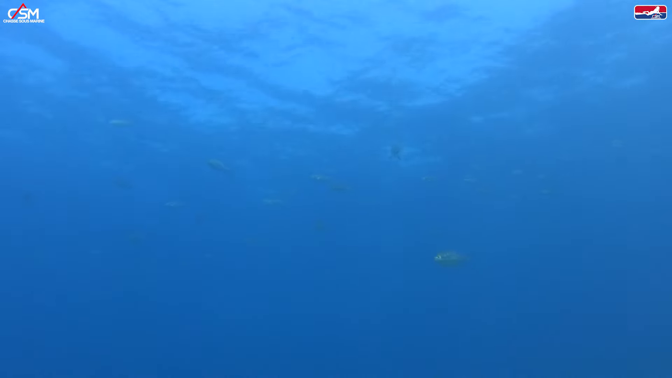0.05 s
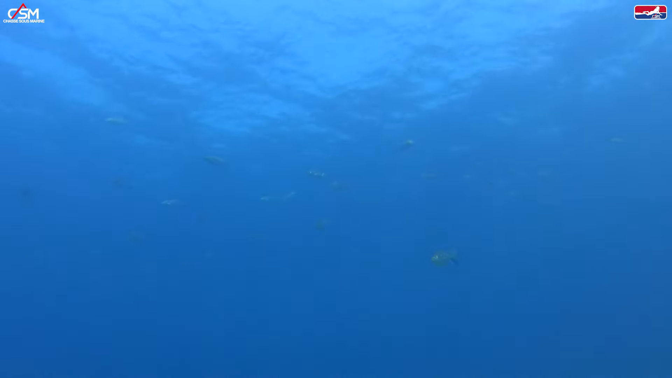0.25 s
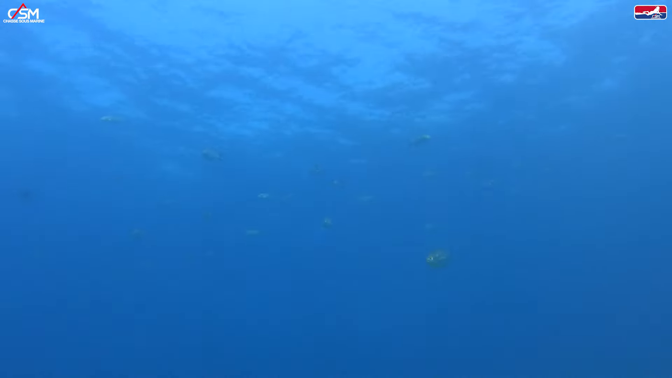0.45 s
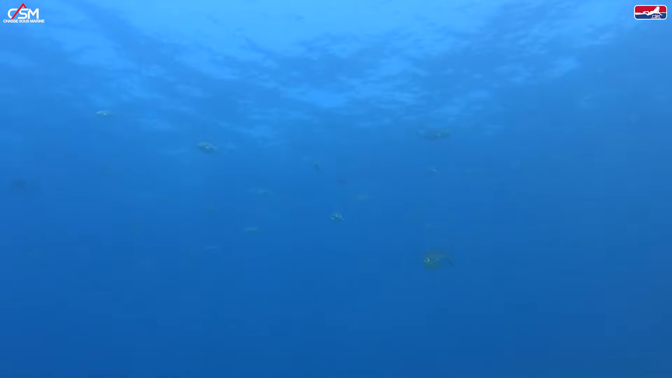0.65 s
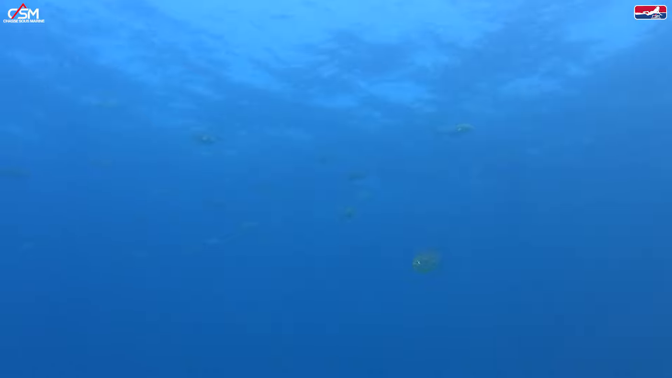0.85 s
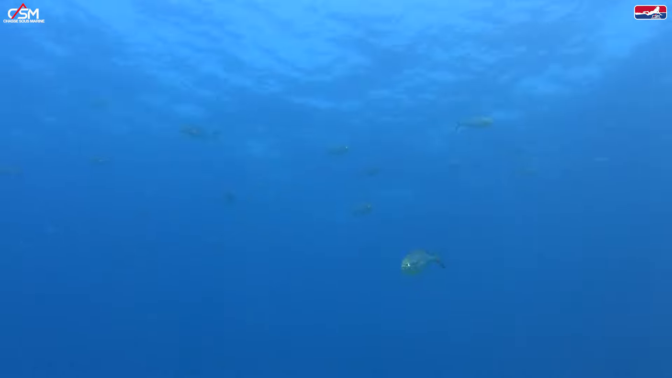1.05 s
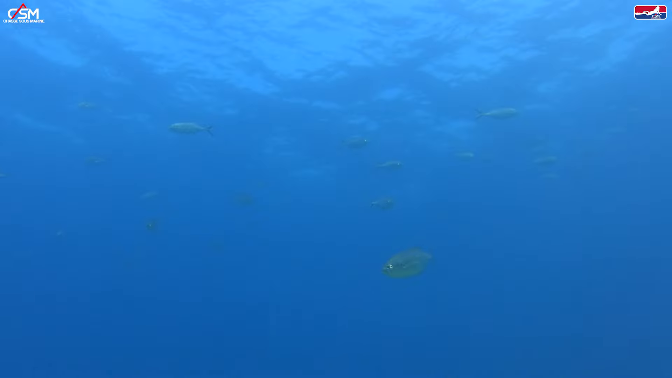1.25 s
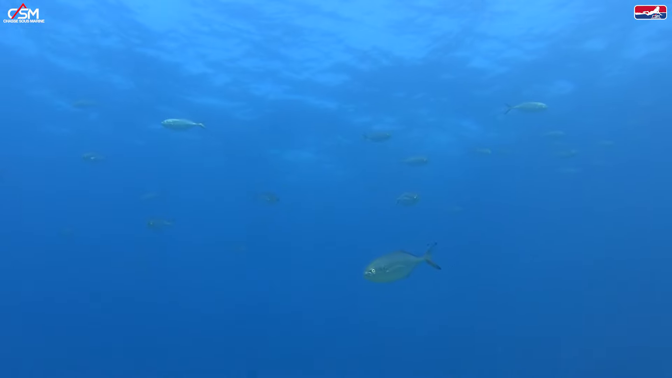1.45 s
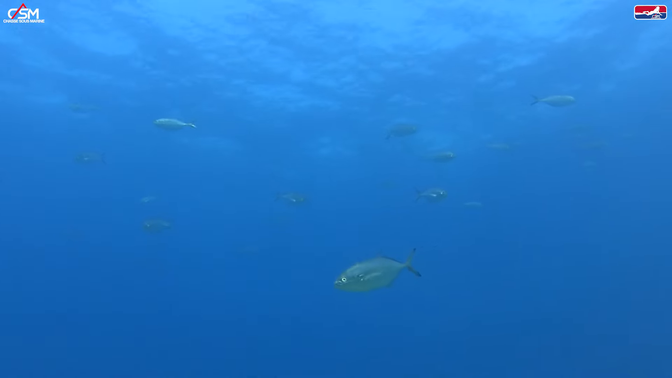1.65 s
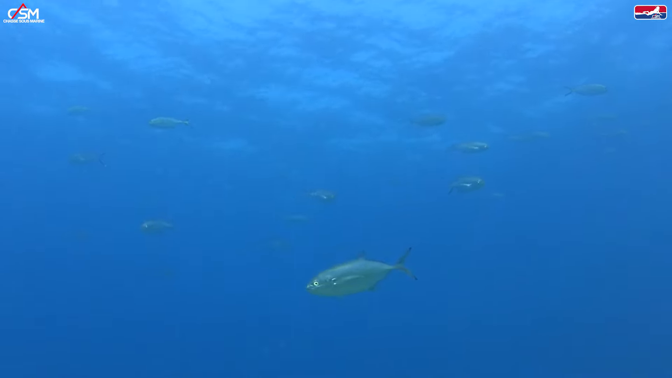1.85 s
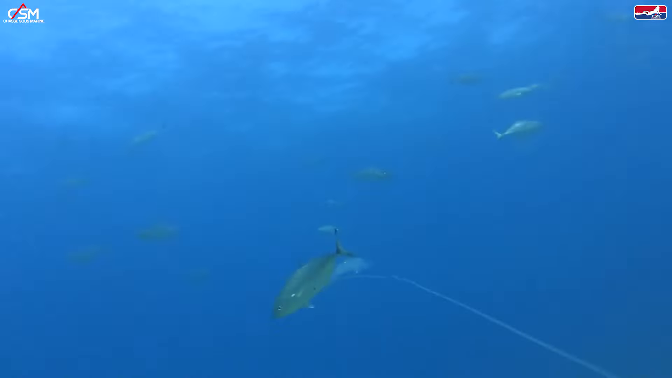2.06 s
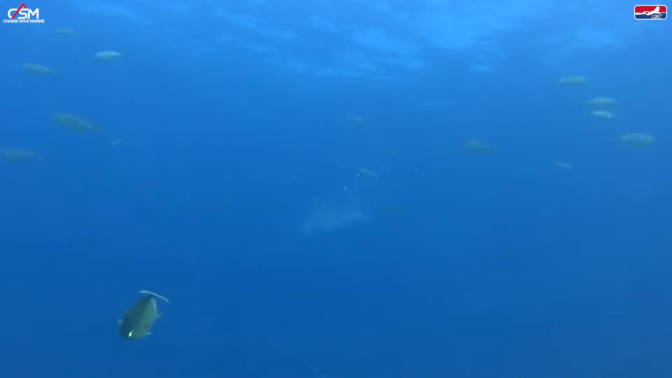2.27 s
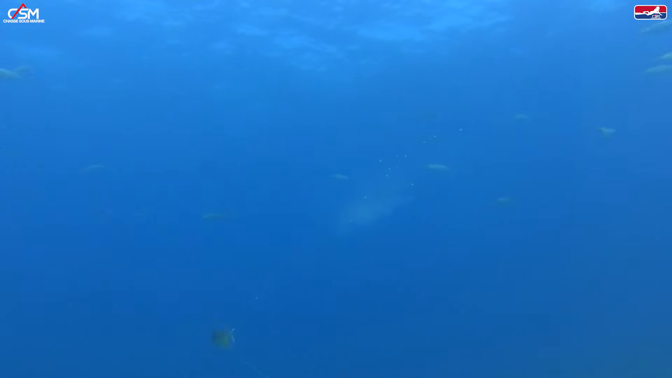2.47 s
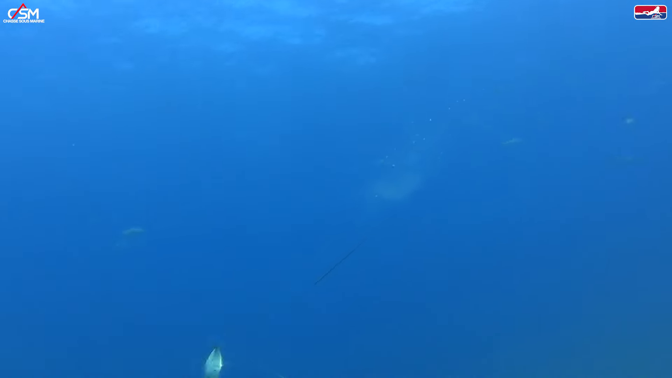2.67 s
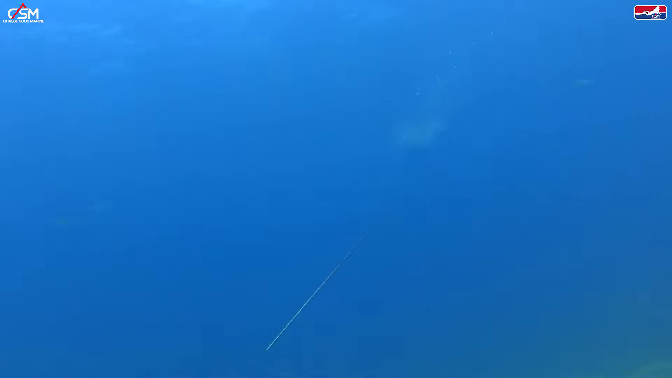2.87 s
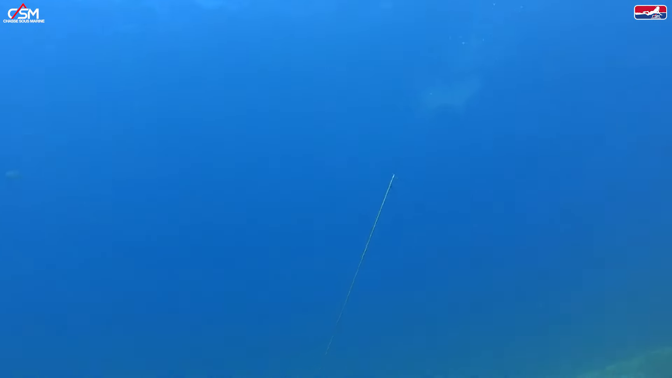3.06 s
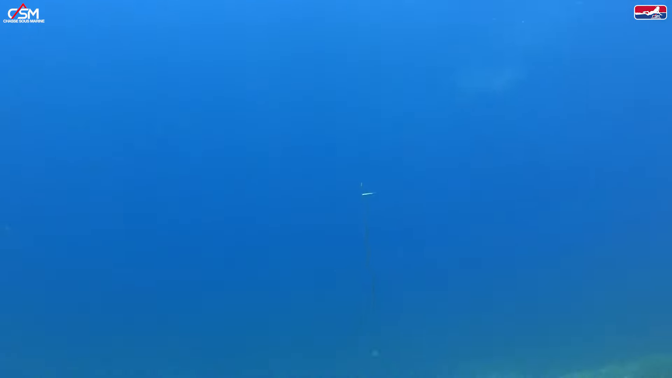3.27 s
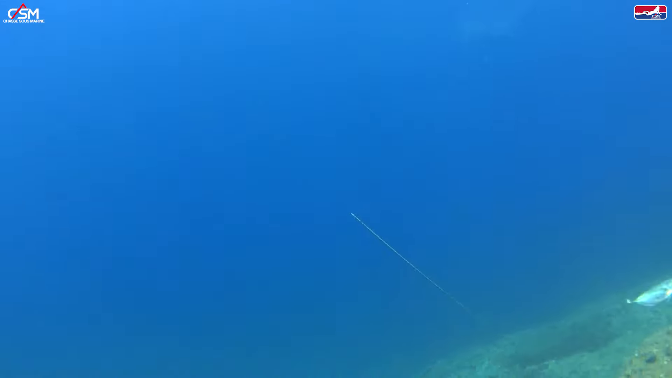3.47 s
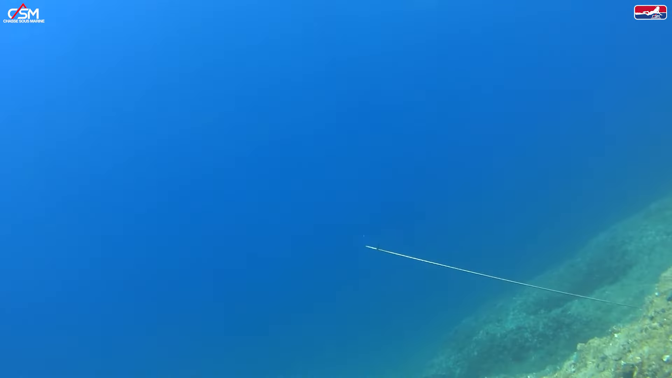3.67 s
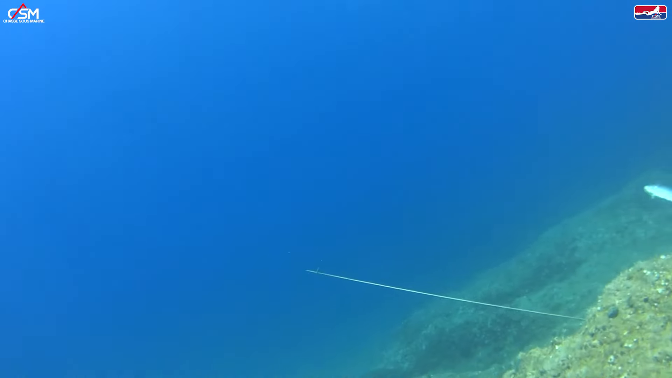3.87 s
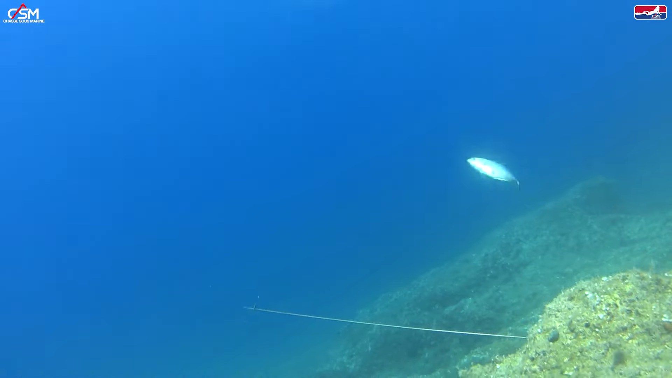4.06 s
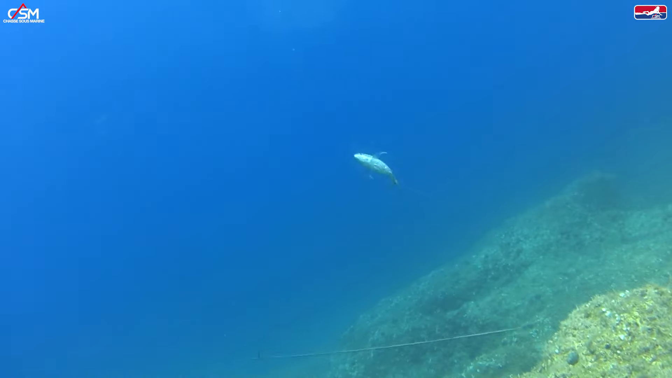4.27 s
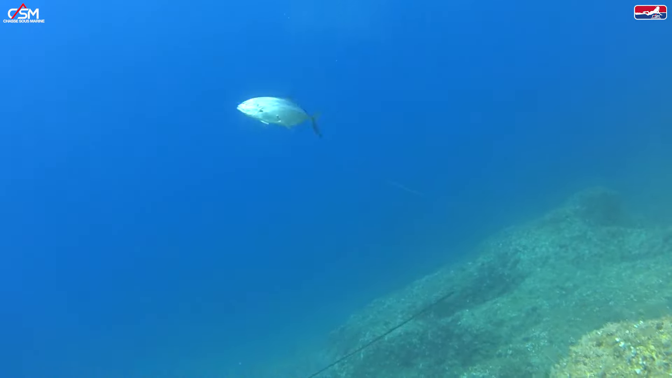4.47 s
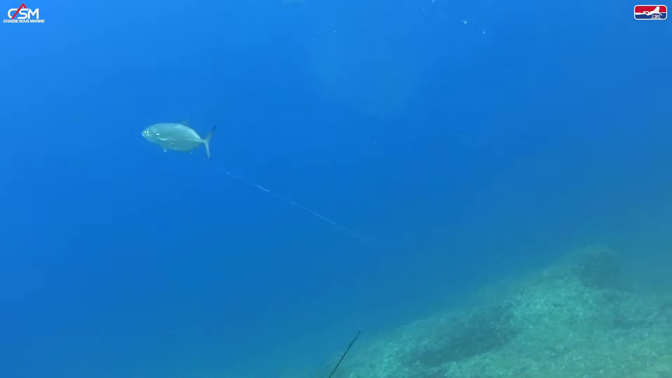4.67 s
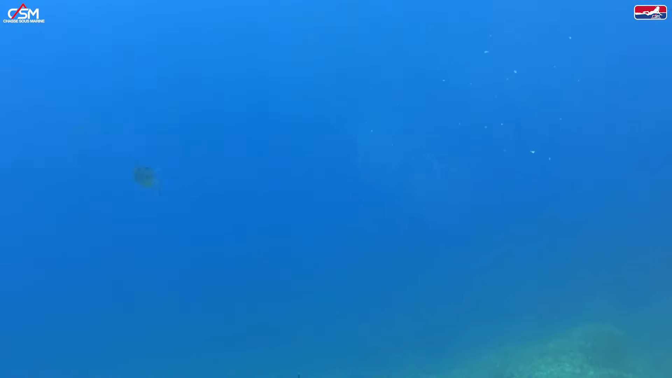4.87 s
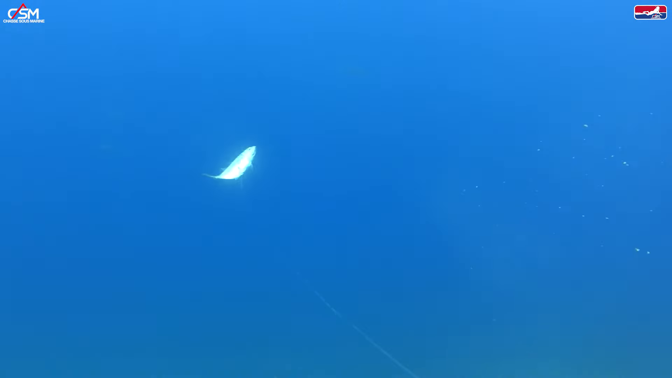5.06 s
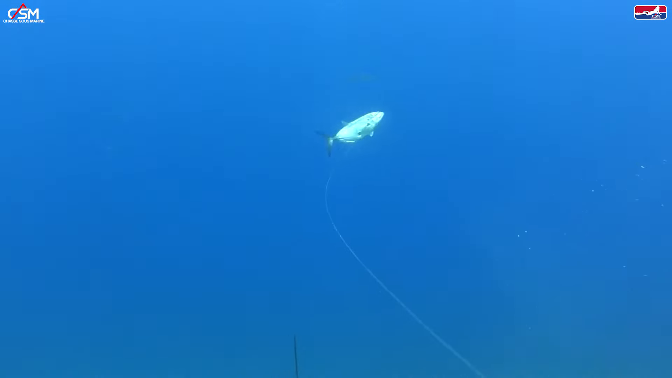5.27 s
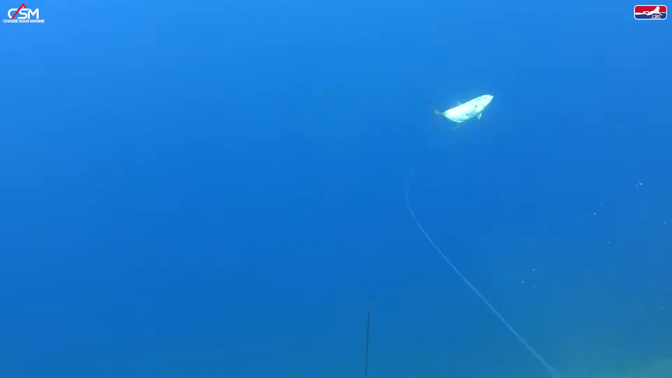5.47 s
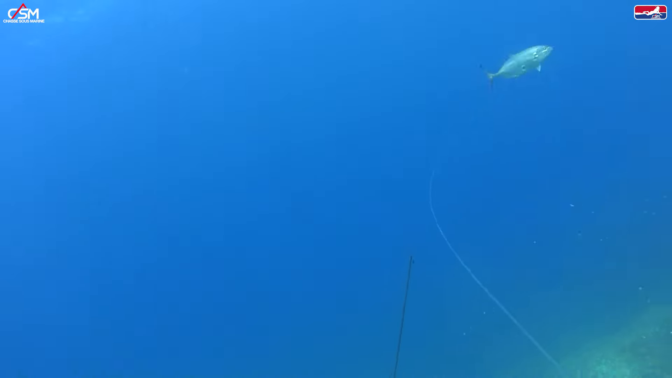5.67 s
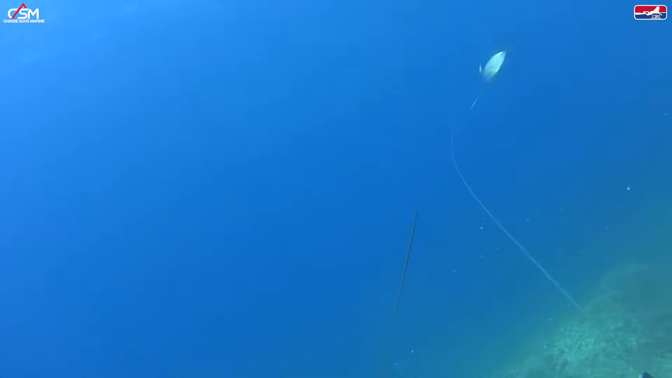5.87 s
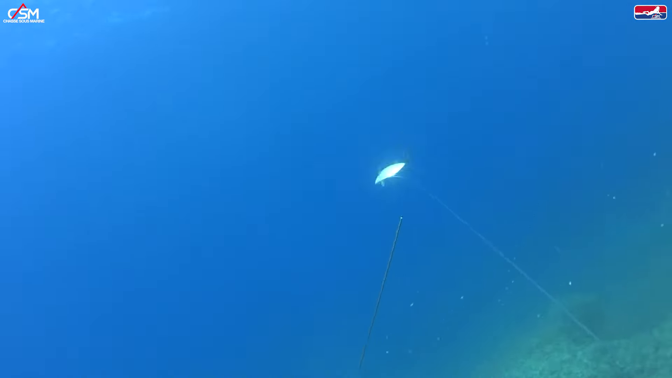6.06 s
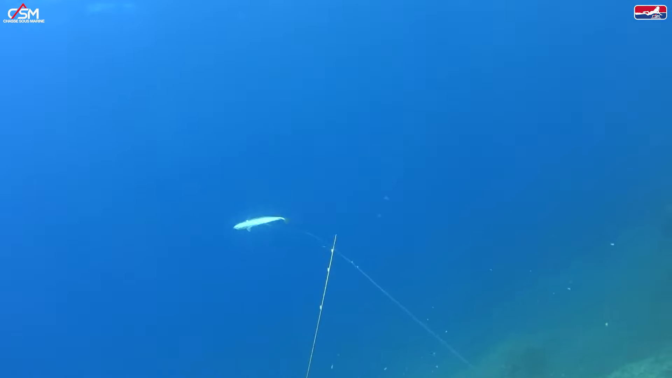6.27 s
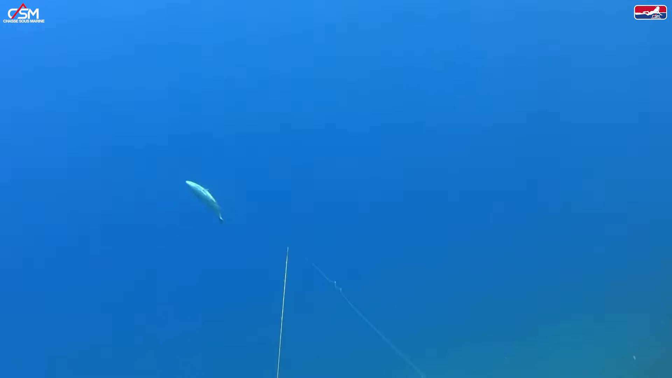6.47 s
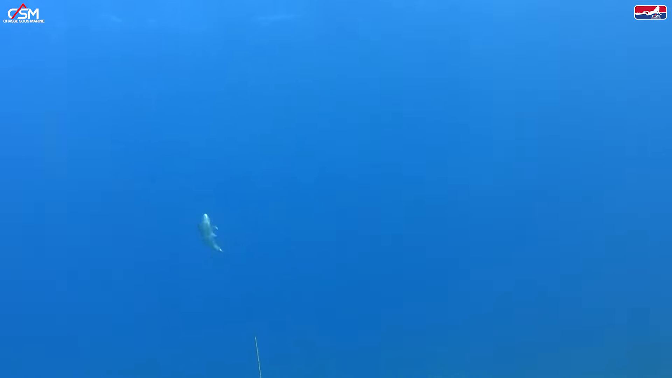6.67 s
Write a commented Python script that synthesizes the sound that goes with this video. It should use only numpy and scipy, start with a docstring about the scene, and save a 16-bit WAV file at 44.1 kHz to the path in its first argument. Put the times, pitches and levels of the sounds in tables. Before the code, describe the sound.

Underwater in open sea near a reef, heard through a sealed housing close to a speargun. Two seconds of quiet hiss, low rumble, soft hum, faint warble and sharp shrimp snaps. Then a loud, boomy shot with rapid knocks and clatter lasting about half a second. A reel follows, rumbling and rattling in quickening pulses as a speared fish pulls line, with faint low strums, until it fades.

```python
"""A hissing, rumbling sea is heard first, with a soft hum, a faint low warble, shrimp snapping on the reef and
now and then a dull knock on the housing. A speargun is then fired under water: shot, recoil and line clatter
shake a sealed camera housing fixed near it. A speared fish drags line off a reel that rumbles and throbs once a
turn, while the taut line strums. Blows, reel, snaps and knocks are pushes that ring the modes of the housing;
sea and tones are noise and narrow bands."""
import sys
import numpy as np
from scipy import signal
from scipy.fft import rfft, irfft, next_fast_len
from scipy.io import wavfile
from scipy.ndimage import uniform_filter1d

SR = 44100
rng = np.random.default_rng(int(sys.argv[2]) if len(sys.argv) > 2 else 0)


def magnitude_from_level(level_db):
    """Linear magnitude for a level in decibels (20 dB per decade)."""
    exponent = np.asarray(level_db, float) / 20
    return 10 ** exponent


def digitize_waveform(pressure):
    """Quantize a signal to 16-bit integers and store it at the path in sys.argv[1].

    Rows of a 2-D input are taken as channels; values are limited to [-1, 1].
    """
    field = np.atleast_2d(pressure).T
    bounded = np.clip(field, -1, 1)
    quanta = np.round(bounded * 32767).astype(np.int16)
    wavfile.write(sys.argv[1], SR, quanta)


N = 296504   # samples


def in_time(rows):
    """Linear interpolation: the columns of a curve at every sample."""
    table = np.transpose(rows)
    return [np.interp(np.arange(N) / SR, table[0], column) for column in table[1:]]


def between(hz, anchors_hz, levels_db):
    """Interpolation on a log-frequency axis between the level columns of the anchor pitches."""
    place = np.interp(np.log(hz), np.log(anchors_hz), np.arange(len(anchors_hz)))
    low = min(int(place), len(anchors_hz) - 2)
    return levels_db[low] + (place - low) * (levels_db[low + 1] - levels_db[low])


def drift(rate_hz):
    """Low-pass noise: white noise through two equal poles, scaled to a spread of 1."""
    step = 40   # samples between computed points
    r = np.exp(-2 * np.pi * step * rate_hz / SR)
    white = rng.standard_normal(N // step + 2002)
    slow = signal.lfilter([1], [1, -2 * r, r * r], white)[2000:]   # settled part
    return np.interp(np.arange(N) / step, np.arange(len(slow)), slow / slow.std())


def grains(per_s, spread_db):
    """Shot noise: random clicks of uneven size and either sign, rms 1."""
    sizes = magnitude_from_level(spread_db * np.minimum(rng.exponential(1, N), 4)) * rng.choice([-1, 1], N)
    scattered = sizes * (rng.random(N) < per_s / SR)
    return scattered / scattered.std()


def clicks(at_s, heights):
    """Impulse excitation: one-sample pushes at the given times."""
    marks = np.full(N, 1e-18)
    np.add.at(marks, (np.asarray(at_s) * SR).astype(int), heights)
    return marks


def wavering(rows, width_hz, left_db, right_db, lead):
    """Random modulation of a gliding carrier gives a narrow, unsteady band; the left leads by a phase angle."""
    hz, level_db = in_time(rows)
    envelope = drift(width_hz) + 1j * drift(width_hz)
    tone = envelope * np.exp(2j * np.pi * np.cumsum(hz) / SR)
    left = magnitude_from_level(left_db) * (tone * np.exp(1j * lead)).real
    right = magnitude_from_level(right_db) * tone.real
    return magnitude_from_level(level_db) * np.array([left, right])


# sea background spectrum: f/Hz, level/dB per Hz, left-right likeness (0-1), left lead/rad
SEA_SPECTRUM = [(22.1, -61, 1, -2.9), (45, -73.5, 0.7, 0.6), (90, -85, 0.73, -1), (200, -84.5, 0.2, 1),
                (415, -84.5, 0.78, -2.5), (860, -86, 0.97, -2), (1046, -86, 0.76, -1.07),
                (1400, -93, 0.76, -2), (2280, -97.5, 0.95, -2), (4500, -105, 0.17, -2.5),
                (6040, -102, 0.53, -4.5), (6600, -107, 0.2, -5.5), (9400, -109, 0.6, -5.5),
                (10400, -110, 1, -18.5)]


def sea():
    """Partial coherence: coloured noise partly shared by the two microphones, with a gentle swell."""
    size = next_fast_len(N)
    hz = np.maximum(np.fft.rfftfreq(size, 1 / SR), 1)
    table = np.transpose(SEA_SPECTRUM)
    level_db, alike, lead = [np.interp(np.log(hz), np.log(table[0]), column) for column in table[1:]]
    alike = np.clip(alike, 0, 1)
    shared, own = rfft(rng.standard_normal((2, size)))
    left = alike * np.exp(1j * lead) * shared + np.sqrt(1 - alike ** 2) * own
    colour = magnitude_from_level(level_db) * np.sqrt(SR / 2) * (hz > 14)
    noise = irfft(colour * np.array([left, shared]), size)[:, :N]
    return noise * magnitude_from_level(1.0 * drift(1.2))


# swelling and fading of the low hum: t/s, level/dB
HUM_LEVEL = [(0, -55.5), (.33, -55.5), (.42, -72), (.7, -66.5), (.95, -53.5), (1.15, -59), (1.66, -56.5),
             (1.75, -63), (2.6, -61), (3.1, -84)]


def hum():
    """Frequency and amplitude modulation: a soft, slightly unsteady low tone, lost once the reel runs."""
    level_db, = in_time(HUM_LEVEL)
    hz = 58.5 + 0.71 * drift(1.5)
    return np.sqrt(2) * magnitude_from_level(level_db + 0.82 * drift(8.8)) * np.sin(2 * np.pi * np.cumsum(hz) / SR)


# faint low warble before the shot: t/s, f/Hz, level/dB before the channel gains
WARBLE_GLIDE = [(0, 300, -88), (.1, 328, -57), (.3, 200, -75), (.5, 226.3, -57), (.7, 159.3, -54),
                (.85, 151.3, -67), (1.35, 125, -58), (1.9, 125, -84)]


def warble():
    """Narrow-band noise on a gliding centre frequency."""
    return wavering(WARBLE_GLIDE, width_hz=36, left_db=-2.0, right_db=-3.5, lead=-0.35)


# housing modes as the two microphones hear them: f/Hz, width/Hz, left level/dB, right level/dB, left lead/rad
HOUSING_MODES = [(35.7, 26.5, 0, 0, -2.3), (69.2, 53, -10, 0, 0.5), (120, 64, -8.5, -3, -2.5),
                 (183, 70, -8, -3.5, -2.5), (231.7, 40.5, 1.5, 0.5, -3), (300, 64, -12.5, -21, 2.5),
                 (396.2, 65, -6.5, 0.4, 2.5), (480.6, 105, -6.5, -1, -2), (620.3, 101, -3, -5, -2),
                 (736.3, 70.3, -8.5, -2.9, -0.84), (796, 42, -7.5, -10, -3), (1023, 174, -1.5, 4.5, -2),
                 (1176, 79, -7.5, -9, 0.5), (1353, 68, -8, -7, -1.5), (1690, 430, -1, -5.5, -1),
                 (1990, 510, -12, -4.5, 1.5), (3080, 1100, -4.5, -13.5, -2.5), (5650, 680, -1.5, -37, -0.3),
                 (6230, 1320, 3.5, 3.5, 1.7), (8400, 2100, -11, -7.5, -6)]


def housing():
    """Modal superposition: every push rings every mode, heard by each microphone at its own level and phase."""
    out = np.zeros((2, N))
    # shared by all modes, so that they move together
    judder, rub = grains(per_s=1500, spread_db=2.5), grains(per_s=900, spread_db=3.5)
    far_snaps = grains(per_s=52, spread_db=3.5) * magnitude_from_level(3.2 * drift(8.0))
    pull_db = reel_levels()
    low_shapes, high_shapes = judder_shapes(held_share=1.01), judder_shapes(held_share=0.82)
    swells = [throb(jerk_share=0.46), throb(jerk_share=1.41)]
    for hz, width_hz, left_db, right_db, lead in HOUSING_MODES:
        r, turn = np.exp(-np.pi * width_hz / SR), np.exp(2j * np.pi * hz / SR)
        steady = np.sqrt(2 * (1 - r * r))   # noise of rms 1 then rings at rms 1
        shapes = high_shapes if hz > HELD_BELOW_HZ else low_shapes
        push = snaps_and_knocks(hz, far_snaps) + blows(hz, steady, judder, shapes)
        push = push + reel(hz, steady, rub, pull_db, swells)
        soft = r ** 3.82   # the mount passes only a broad band around each mode
        for stage in range(2):
            push = signal.lfilter([1 - soft], [1, -soft * turn], push)
        ringing = -1j * signal.lfilter([1], [1, -r * turn], push)
        left = magnitude_from_level(left_db) * (ringing * np.exp(1j * lead)).real
        out += [left, magnitude_from_level(right_db) * ringing.real]
    return out


# near snaps and a few dull knocks on the housing, as relative drives of the modes: t/s, peak level/dB, body
# level/dB
SNAPS_AND_KNOCKS = [(0.282, -49, -58), (0.43, -65, -53), (0.591, -45, -66), (0.6197, -37.5, -51.5),
                    (0.629, -50, -67), (0.819, -52, -56), (0.9525, -44.5, -68), (1.192, -41.5, -52.5),
                    (1.4494, -68, -53), (1.5779, -45.5, -50.5), (1.6642, -48, -69), (1.734, -47, -60),
                    (1.8111, -65, -52), (3.2311, -41.5, -52.5), (3.497, -42, -54), (3.638, -53, -42),
                    (4.0236, -44, -58), (4.0609, -76, -43), (4.3247, -49, -60), (4.5336, -46, -54),
                    (4.9656, -70, -41), (5.075, -43.5, -59), (5.544, -50, -53), (6.0465, -44.5, -76),
                    (6.209, -53, -57), (6.6191, -85, -50)]


def snaps_and_knocks(hz, far):
    """Impulse and reflection: near snaps and a few dull knocks on the housing, each with one echo off the rock,
    over a scatter of faint far snaps."""
    echo_s, echo_db = 0.0073, -7
    s, peak_db, body_db = np.transpose(SNAPS_AND_KNOCKS)
    parts_db = [body_db - 9.0, body_db + 14.0, (body_db + peak_db) / 2 + 14.5, peak_db + 3.5]
    heights = magnitude_from_level(between(hz, (300, 1500, 3000, 6000), parts_db))
    near = clicks(s, heights) - clicks(s + echo_s, heights * magnitude_from_level(echo_db))   # the echo is inverted
    return near + magnitude_from_level(between(hz, (300, 1500, 6000), [-110.0, -86.0, -83.0])) * far


# anchor pitches of a blow, deep, thump, ring, knock, crack: f/Hz
BLOW_ANCHORS = (70, 240, 1000, 1900, 5500)
# shot, recoil and clatter of the line, as relative drives of the modes:
# t/s, thump level/dB, ring level/dB, crack level/dB, nominal judder hold/s
BLOW_EVENTS = [(1.947, -5, -19.5, -48, 0.014), (1.962, -7, -15.5, -49.5, .02),
               (1.983, -2, -13.5, -41.5, 0.021), (2.006, -2.5, -36, -36, .012),
               (2.019, -28, -7, -50, 0.0027), (2.034, -1.5, -31, -57, 0.022),
               (2.066, -10, -18.5, -43, 0.0035), (2.108, -13, -28, -57, 0.0076),
               (2.136, -22, -25.5, -52.5, 0.001), (2.208, -42, -36, -57, 0.0028),
               (2.244, -30, -27, -54.5, 0.0099), (2.261, -30, -23.5, -47.5, 0.0095),
               (2.281, -7, -18, -65, 0.017), (2.309, -15.5, -12, -67, 0.0083),
               (2.325, -18.5, -19.5, -86.5, .015), (2.352, -19, -40, -77, .004),
               (2.38, -19.5, -12.5, -75, 0.0023), (2.399, -21, -51, -62, 0.0034),
               (2.414, -16.5, -61, -58, 0.011), (2.455, -15.5, -21, -63, 0.0043),
               (2.499, -29, -60, -65, .004), (2.563, -51, -42.5, -62, 0.0028)]
HELD_BELOW_HZ = 1500   # above this a blow is softer and held for less time


def blows(hz, steady, grain, shapes):
    """Impact excitation: a hard contact followed by judder."""
    deep_db, knock_share = -1.5, 0.3   # deep relative to the thump; knock lies between ring and crack
    s, thump_db, ring_db, crack_db, held = np.transpose(BLOW_EVENTS)
    knock_db = ring_db + knock_share * (crack_db - ring_db)
    parts_db = [thump_db + deep_db, thump_db, ring_db, knock_db, crack_db]
    bass_loss_db = 19.0 * max(np.log2(70 / hz), 0)
    uneven_db = 1.66 * rng.standard_normal(len(s))
    heights = magnitude_from_level(between(hz, BLOW_ANCHORS, parts_db) - bass_loss_db + uneven_db)
    contact_db = 4.5 - 3.5 * (hz > HELD_BELOW_HZ)
    contact = magnitude_from_level(contact_db) * clicks(s, heights * rng.choice([-1, 1], len(s)))
    return contact + magnitude_from_level(-6.0) * steady * (heights @ shapes) * grain


def judder_shapes(held_share):
    """Exponential decay: each blow's judder starts at once, holds, then dies away."""
    fade_s = 0.0059
    t = np.arange(N) / SR
    shapes = []
    for row in BLOW_EVENTS:
        after_hold = np.clip(t - row[0] - held_share * row[-1], 0, 1)
        shapes.append((t >= row[0]) * np.exp(-after_hold / fade_s))
    return np.array(shapes)


# shudder of rubber slings and shaft at release and recoil: t/s, hold/s, f/Hz, level/dB before the channel gains
SLING_KICKS = [(1.948, 0.085, 150, -12), (2.068, 0.051, 140, -17), (2.28, 0.056, 148.8, -25),
               (2.42, 0.033, 111.8, -37)]


def slings():
    """Transient oscillation: the slings and shaft shudder up quickly, hold, then fall to rest."""
    rises_s, fall_s, rest_db = (0.0057, 0.028, 0.017, 0.016), 0.028, -41
    glide = [(SLING_KICKS[0][0] - 0.006, 150, -80)]
    for (s, held, hz, db), rise in zip(SLING_KICKS, rises_s):
        glide += [(s - rise, hz, rest_db), (s, hz, db)]
        glide += [(s + held, hz, db - 2.5), (s + held + fall_s, hz, rest_db)]
    glide = sorted(glide) + [(2.62, 110.7, -61)]
    return wavering(glide, width_hz=110, left_db=-1.5, right_db=4.0, lead=0.11)


# anchor pitches of the reel, rumble, drum, low rattle, valley, bright rattle, high rattle: f/Hz
REEL_ANCHORS = (50, 236, 450, 600, 740, 1100)


def reel(hz, steady, grain, pull_db, swells):
    """Friction excitation: dense rubbing under the line's pull; higher modes throb most with the turns."""
    treble_loss_db = 60.0 * max(np.log2(hz / 1300), 0)   # soft contacts carry no treble
    level_db = between(hz, REEL_ANCHORS, pull_db) - treble_loss_db
    share = np.clip(np.interp(np.log(hz), np.log([60, 236, 450]), [0.1, 0.5, 0.95]), 0, 1)
    swell = magnitude_from_level(-4.5) * swells[0] if hz < 560 else magnitude_from_level(-4.0) * swells[1]
    rubbing = 0.34 * grain + 0.89 * rng.standard_normal(N)
    return steady * magnitude_from_level(level_db + 2.6 * drift(20.3)) * (1 - share + share * swell) * rubbing


# line running off the reel, as drives of the modes: t/s, rattle level/dB, brightness/dB over the rattle
LINE_PULL = [(1.94, -88, -1), (1.96, -52, -3), (2.17, -46, 5.5), (2.3, -31, -6), (2.55, -49, -3),
             (2.68, -26, -4.5), (2.85, -30.5, -6), (3.1, -26.5, -5), (3.5, -25.5, -11), (3.65, -26.5, 1),
             (3.85, -28.5, -1), (4.05, -30.5, -4.5), (4.25, -31.5, -1), (4.3, -41, -20), (4.55, -40.5, -1),
             (4.75, -28.5, -7.5), (4.97, -26, -2), (5.1, -33.5, -2.5), (5.25, -33, -7.5), (5.5, -25, -3),
             (5.65, -30, -2.5), (5.8, -24.5, -1.5), (6.05, -28, -11.5), (6.15, -38.5, -2),
             (6.29, -27.5, -18), (6.42, -48, -6.5), (6.6, -66, 2)]
# water rumbling round the housing as the diver moves, as a drive of the modes: t/s, level/dB
WATER_RUMBLE = [(1.94, -90), (1.96, -43.5), (2.5, -44), (2.8, -42), (3.2, -51), (3.7, -40.5), (4.2, -42),
                (4.9, -50), (5.25, -52), (5.5, -41.5), (5.8, -38.5), (6.2, -46), (6.5, -56)]


def reel_levels():
    """Spectral envelope: drives at the reel's anchor pitches, from water rumble and the pull on the line."""
    rattle_db, bright_db = in_time(LINE_PULL)
    drum_db = -27.5 + 0.5 * (rattle_db + 30)   # the drum follows half of the rattle's change
    drum_db = np.minimum(drum_db, rattle_db + 22.5)
    valley_db = rattle_db + bright_db / 2 - 4.0   # under the rattles on either side
    bright_rattle_db = rattle_db + bright_db
    high_rattle_db = bright_rattle_db - 15
    return [in_time(WATER_RUMBLE)[0], drum_db, rattle_db, valley_db, bright_rattle_db, high_rattle_db]


# line paid out: t/s, turns of the drum (each whole turn tops a throb), depth of the throb (0-1)
DRUM_TURNS = [(1.94, -11.5, 0.05), (2.575, -4., .6), (3.165, 6., 0.51), (3.755, 16., 0.55),
              (3.92, 19.5, 0.19), (4.062, 21., 0.5), (4.148, 22., 0.67), (4.232, 23., .75),
              (4.41, 25.5, 0.7), (4.61, 28.5, 0.55), (4.815, 30.5, .25), (4.95, 33., .4), (5.2, 36., 0.85),
              (5.59, 42., 0.83), (5.715, 44., 0.5), (5.81, 44.5, 0.08), (5.9, 46., .7), (6.045, 48., .9),
              (6.36, 52.5, 0.58), (6.72, 58, 0.28)]
# turns on which the fish jerks the line: t/s, level/dB before the jerk share
LINE_JERKS = [(2.755, -3), (3.405, 5), (3.645, 4.5), (3.7, -3.5), (4.065, 5.5), (4.23, 3.5), (4.95, 6),
              (5.59, 0.5), (5.9, 4), (6.045, 9.5)]


def throb(jerk_share):
    """Periodic amplitude modulation: the rubbing swells once a turn, no two turns alike."""
    sharpness, spread_db, top_db = 1.63, 2.0, 3
    turns, depth = in_time(DRUM_TURNS)
    turns, depth = turns + 20, np.clip(depth, 0, 1)   # whole shift: every turn gets a positive index
    strength_db = spread_db * rng.standard_normal(100)
    for s, jerk_db in LINE_JERKS:
        strength_db[int(turns[int(s * SR)] + 0.5)] = jerk_share * jerk_db
    once_a_turn = np.abs(np.cos(np.pi * turns)) ** (2 * sharpness)
    turn_db = strength_db[(turns + 0.5).astype(int)]
    return magnitude_from_level(turn_db * once_a_turn ** 0.5) * (1 - depth + depth * magnitude_from_level(top_db) * once_a_turn)


# strums of the taut line: t/s, length/s, first f/Hz, top f/Hz, top level/dB before the channel gains
LINE_SWEEPS = [(2.616, 0.16, 109.8, 113.6, -32.5), (2.9, 0.43, 148.4, 170, -48),
               (3.612, .22, 120, 116.8, -35.5), (3.85, 0.51, 185, 287.5, -32.5),
               (4.6, 0.62, 108, 182.6, -32.5), (5.271, 0.29, 182.4, 255, -34.5),
               (5.649, 0.297, 168, 187.5, -34.5), (5.98, 0.18, 161.8, 211.5, -36.5),
               (6.45, 0.33, 120, 109, -46)]


def line():
    """String tension sets pitch: the line strums through the water, mostly rising as it tightens."""
    top_share, rise_db, drop_db, slack_pitch = 0.72, 14.5, 19, 0.75   # top at this share of the length
    glide = [(2.1, 110, -75)]
    for s, span, first_hz, top_hz, db in LINE_SWEEPS:
        glide += [(s, first_hz, db - rise_db), (s + top_share * span, top_hz, db)]
        glide += [(s + span, slack_pitch * top_hz, db - drop_db)]
    return wavering(sorted(glide), width_hz=18.0, left_db=-1.0, right_db=5.5, lead=-2.18)


# low tone while the reel runs hard: t/s, f/Hz, level/dB before the channel gains
DRONE_GLIDE = [(4.68, 401.5, -83), (4.74, 393.4, -31.5), (4.85, 364.4, -38), (4.95, 395, -31.5),
               (5.05, 373.8, -40), (5.12, 378.7, -64), (5.27, 410.2, -36), (5.36, 426, -38),
               (5.45, 434, -75)]


def drone():
    """Narrow-band noise: a slowly wavering tone that swells and fades."""
    return wavering(DRONE_GLIDE, width_hz=14.7, left_db=-6.0, right_db=5.5, lead=1.8)


# brief whistle while the reel runs hardest: t/s, f/Hz, level/dB before the channel gains
WHISTLE_GLIDE = [(5.81, 1146, -85), (5.84, 1280, -48.5), (5.9, 1400, -55), (5.93, 1379, -67),
                 (5.955, 1240, -54), (5.98, 1356, -50), (6.0, 1298, -47.5), (6.02, 1090, -54),
                 (6.04, 946, -76)]


def whistle():
    """Frequency glide: a rough, narrow band bends up and down."""
    return wavering(WHISTLE_GLIDE, width_hz=87, left_db=1.5, right_db=-1.0, lead=-0.66)


def scene():
    """Linear superposition of all sources at the two microphones."""
    return sea() + hum() + warble() + housing() + slings() + line() + drone() + whistle()


def top_cut(x):
    """Nothing passes above the cut-off."""
    return signal.sosfilt(signal.butter(12, 11900, fs=SR, output="sos"), x)


def record(dry):
    """Dynamic compression: gain ducks after loud blows and recovers; peaks are rounded and the top is cut."""
    level_db = 10 * np.log10(uniform_filter1d(np.mean(dry ** 2, axis=0), size=400) + 1e-12)
    fall_db = 15.1 * np.arange(N) / SR   # release, dB per second of held level
    held_db = np.maximum.accumulate(level_db + fall_db) - fall_db
    duck_db = uniform_filter1d(-0.15 * np.maximum(held_db + 23.0, 0), size=300)
    rounded = 1.05 * np.tanh(dry * magnitude_from_level(duck_db) / 1.05)
    cut = signal.sosfilt(signal.cheby2(14, 60, 11900, fs=SR, output="sos"), rounded)
    return top_cut(cut)


dry = scene()
out = record(dry)
digitize_waveform(out)
```